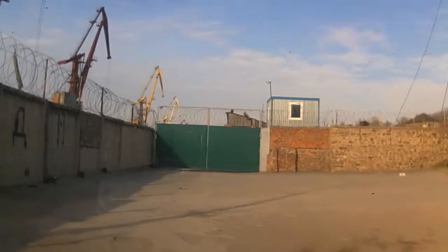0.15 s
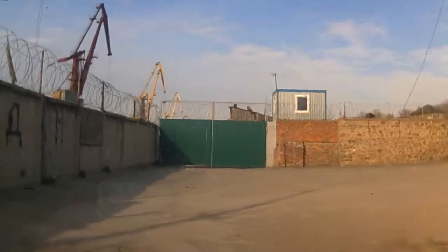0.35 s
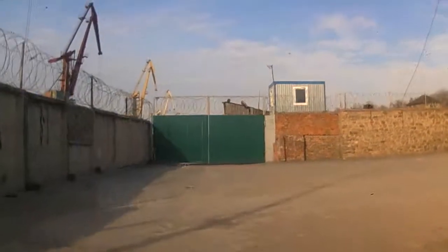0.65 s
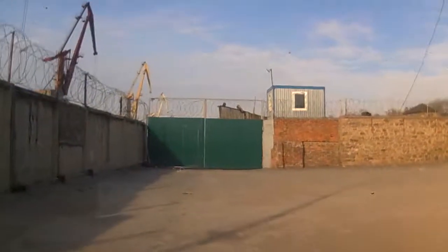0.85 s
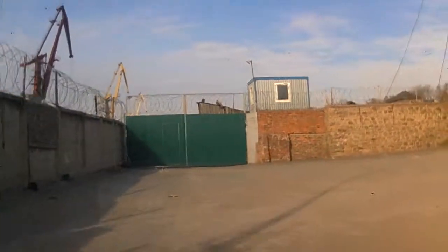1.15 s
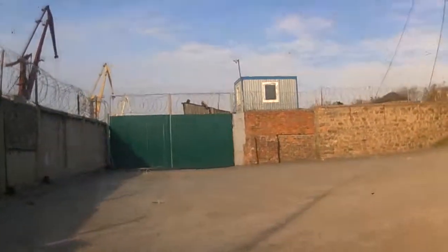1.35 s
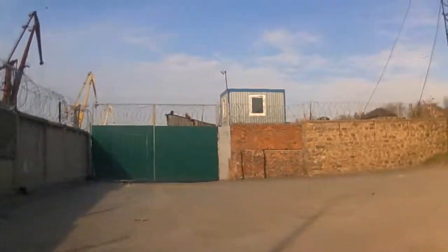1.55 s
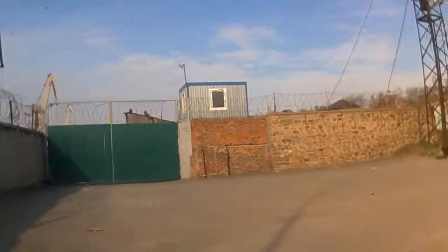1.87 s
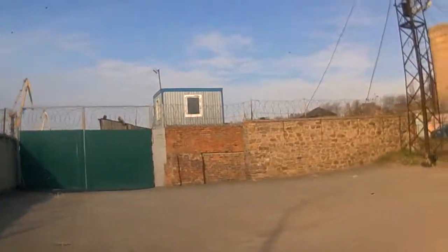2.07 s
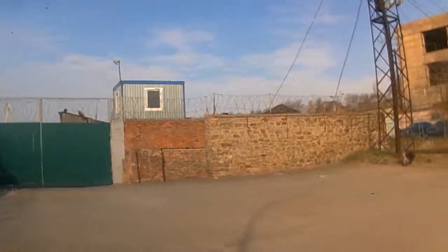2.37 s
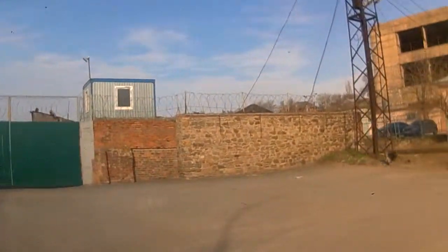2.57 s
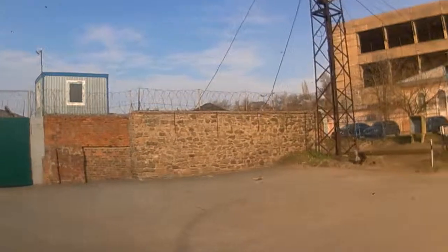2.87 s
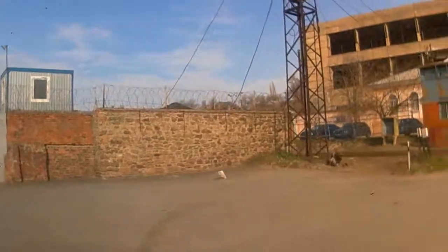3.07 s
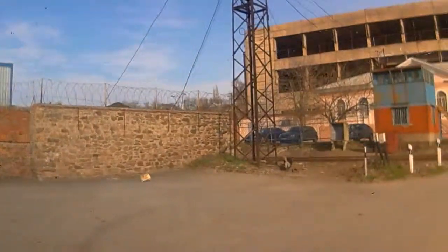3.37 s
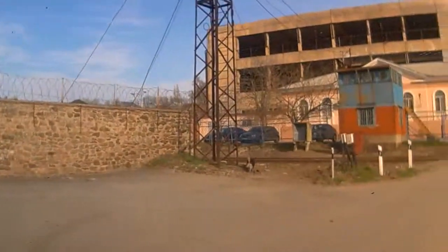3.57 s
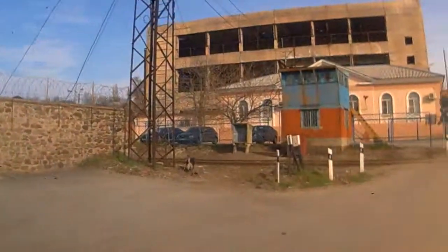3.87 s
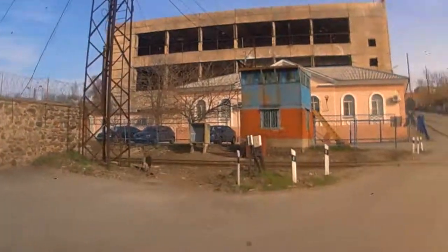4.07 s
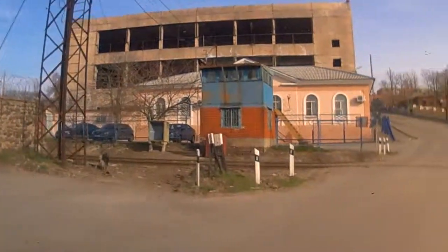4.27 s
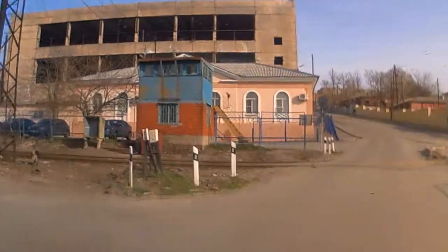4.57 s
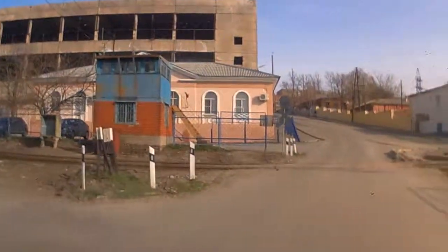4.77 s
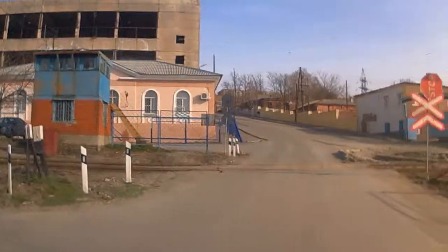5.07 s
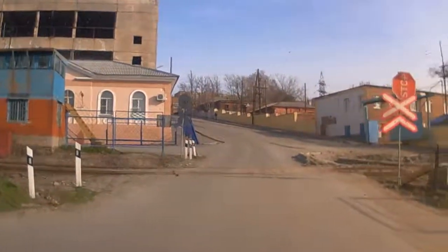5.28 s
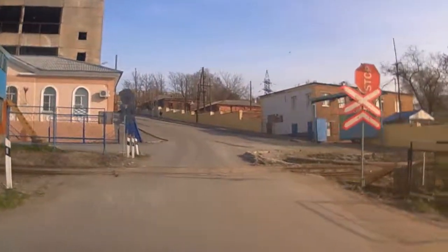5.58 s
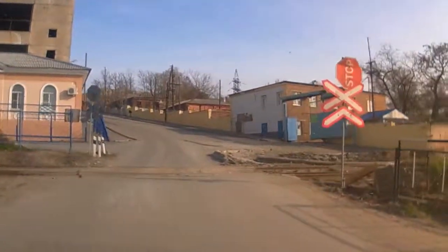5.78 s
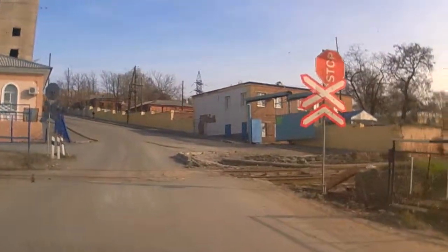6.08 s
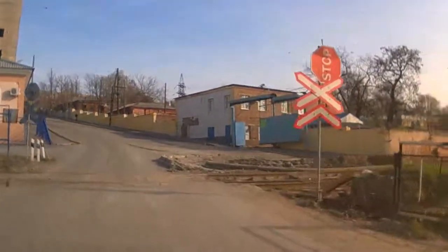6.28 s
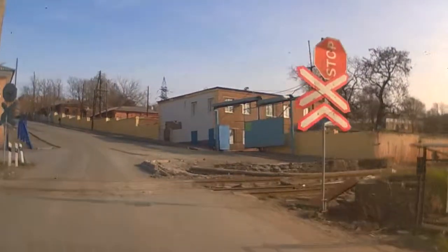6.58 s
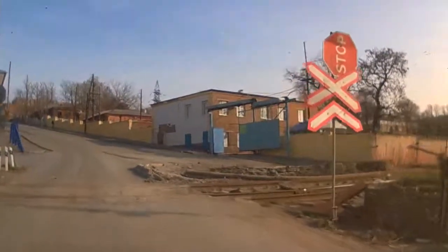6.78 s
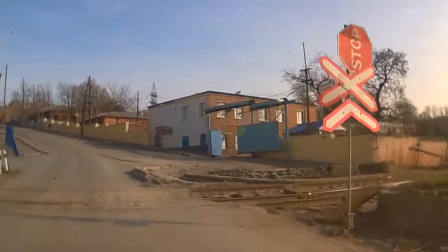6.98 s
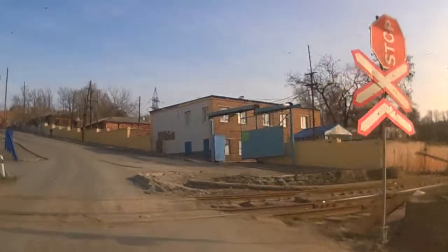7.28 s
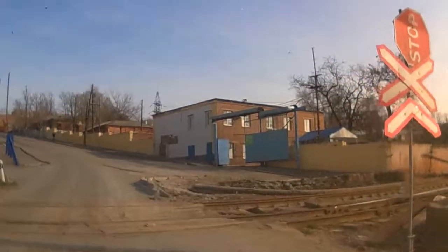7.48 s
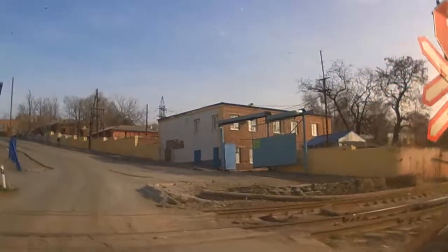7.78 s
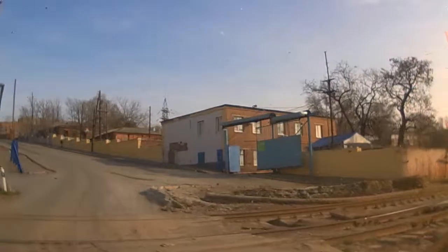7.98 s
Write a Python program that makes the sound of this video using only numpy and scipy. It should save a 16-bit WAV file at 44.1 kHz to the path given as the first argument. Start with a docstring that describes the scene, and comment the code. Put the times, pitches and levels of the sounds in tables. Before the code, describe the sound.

A car rolls slowly over rough ground, heard from inside as a low, uneven rumble over a faint engine hum. Four sharp knocks come from the steering column in the first three seconds, among dull suspension thuds and light trim rattles. The ride then calms, with a brief rubbery groan and one more knock around six seconds. The cabin sound is all on the left; the right carries only faint hiss and buzz.

```python
"""A low road rumble with sharp knocks, heard inside a car that rolls slowly over a rough yard, turns
and brakes. The ground shakes the body and the cabin air, a catch snaps in the steering column, loose
trim rattles, the suspension thuds and hands slide on the wheel over a faint engine hum. All of this is
on the left, the only side with a microphone. The open right input carries amplifier hiss and a buzz
from the picture electronics."""
import sys
import numpy as np
from scipy import signal
from scipy.fft import rfft, irfft
from scipy.io import wavfile
from scipy.ndimage import uniform_filter1d

SR = 44100
rng = np.random.default_rng(int(sys.argv[2]) if len(sys.argv) > 2 else 0)


def dump_mix(stems):
    """Bounce the given channels to the path in sys.argv[1] as a 16-bit WAV at rate SR."""
    frames = np.atleast_2d(stems).T  # one column per channel
    limited = np.clip(frames, -1, 1)  # hard clip at full scale
    pcm = np.round(limited * 32767).astype(np.int16)
    wavfile.write(sys.argv[1], SR, pcm)


N = 358974
T = np.arange(N) / SR


def road():
    """Rough ground rocks the body, sets the cabin air booming and shakes the suspension and panels."""
    # roughness of the ground: (time [s], rumble [dB], suspension drone [dB], tyre roar [dB])
    roughness = [(0, -54.5, -47.5, -58), (.33, -48, -45, -58), (.7, -54.5, -51, -57), (1.2, -52, -44, -57),
                 (1.42, -55, -46.5, -55), (1.58, -58, -53, -57), (1.75, -50, -45, -59),
                 (2.1, -56, -52, -63.5), (2.4, -51, -51, -57.5), (2.68, -57, -43.5, -53),
                 (2.95, -52, -49, -55.5), (3.7, -58.5, -46.5, -58), (4.1, -51, -48.5, -59.5),
                 (4.62, -53, -47.5, -61), (5.2, -51.5, -51.5, -60.5), (5.95, -56.5, -48.5, -61.5),
                 (6.4, -56.5, -52, -63), (6.92, -54, -53.5, -62.5), (7.05, -57, -55, -64.5),
                 (8.14, -57, -56, -67)]
    rumble = level(roughness)

    # the body pitches over bumps: (time [s], level [dB])
    jolts = [(.2, -36.5), (.54, -37), (.7, -44), (.88, -48), (1.09, -47), (1.47, -39.5), (1.65, -37),
             (1.77, -41.5), (2.45, -46), (2.57, -43), (2.69, -35), (2.76, -37.5), (2.85, -40.5),
             (3.4, -39.5), (3.74, -51), (4.19, -48), (4.44, -54), (4.6, -47), (4.76, -40.5), (5.24, -57),
             (5.49, -46), (6.67, -49), (7.07, -48), (7.75, -44)]
    # the deep sound of the rocking body: (frequency [Hz], level [dB])
    heave_spectrum = [(10, -4), (25, 3.5), (40, -4.5), (50, -9.5), (70, -30)]
    heave = swells(jolts, rise_s=0.027, fall_s=0.036, bed=rumble * gain_of(3.5) * flicker(5.7, 2.1))
    heave *= steadied(coloured(heave_spectrum), samples=2500)

    # ridges set the cabin air booming: (time [s], level [dB])
    ridges = [(.5, -35), (.62, -40), (.79, -61), (.94, -40), (1.32, -47), (1.47, -43), (1.72, -48),
              (1.87, -43), (2.16, -46), (2.44, -46.5), (2.56, -58), (2.83, -44), (3.08, -43), (3.26, -42.5),
              (3.44, -42.5), (3.56, -40), (3.74, -38), (3.9, -38), (4.2, -45), (4.31, -44), (4.42, -38),
              (4.6, -41), (4.73, -39.5), (5.1, -43), (5.43, -42.5), (5.58, -39), (5.98, -45.5), (6.2, -45),
              (6.36, -44.5), (6.66, -54), (6.94, -46), (7.14, -44)]
    boom_hz, boom_width_hz = 55.7, 21.8  # lowest resonance of the cabin air
    boom = swells(ridges, rise_s=0.047, fall_s=0.07, bed=rumble * gain_of(4.9) * flicker(22, 2.3))
    boom *= steadied(ringing_noise([(boom_hz, boom_width_hz, 0)]), samples=1600)

    # suspension resonances: (frequency [Hz], width [Hz], level [dB])
    drone_modes = [(107.4, 35, 2), (136.7, 15, -6.5), (191.8, 66, -6), (262, 39, -17.5)]
    drone = evened(ringing_noise(drone_modes) * flicker(25, 0.23) * flicker(9, 1.9))

    # tyre noise: (frequency [Hz], level [dB])
    tyre_spectrum = [(150, -10.5), (250, -0.5), (340, -4), (550, -8), (1020, -15.5), (1500, -19),
                     (2100, -26.5), (2900, -34.5), (4000, -48)]
    # panel resonances: (frequency [Hz], width [Hz], level [dB])
    panel_modes = [(406, 140, -15), (750, 190, -12), (1687, 230, -18)]
    roar = evened((coloured(tyre_spectrum) + ringing_noise(panel_modes)) * flicker(45, 2.9))
    return heave + boom + level(roughness, column=2) * drone + level(roughness, column=3) * roar


def steering_knocks():
    """A catch in the steering column snaps over and bounces the same way each time, so knocks are alike."""
    # snaps: (time [s], level [dB], bass [dB], middle [dB], brightness [dB per octave], tick [dB])
    snaps = [(0.6406, -16.5, -0.5, -3, 0.1, -53), (1.3549, -17, 2, -0.2, 1.5, -53.5),
             (2.099, -17.5, -2.5, -2, .2, -57), (2.248, -43.5, -8, -6, 8, -65),
             (2.7415, -24.5, 0, 1.5, 2.5, -64.5), (6.1001, -27.5, -1.5, 2, 0, -71),
             (6.243, -43, -3, 8, 4.5, -82), (7.8, -43.5, -16, -12, 8.5, -70)]
    # bounces after each snap: (delay [s], level [dB])
    rebounds = [(.0017, 4), (.0036, 2), (.0054, 6), (.0073, 7), (.0112, -4), (.015, -11), (.0195, -8),
                (.024, -14)]
    out, blows = np.zeros(N), np.zeros(2000)
    blows[0] = 1
    for delay, db in rebounds:
        blows[round(delay * SR)] = gain_of(db)
    for (start, db, bass_db, middle_db, tilt_db, tick_db), tick in zip(snaps, ticks(len(snaps), t60=0.08)):
        knock = signal.fftconvolve(blows, dashboard_ring(3500, tilt_db, bass_db, middle_db))
        add(out, start, gain_of(db) * knock / abs(knock).max())
        add(out, start, gain_of(tick_db) * tick)
    return out


def dashboard_ring(samples, tilt_db, bass_db=0., middle_db=0., t60=np.inf):
    """Column and dashboard ring after one soft blow; t60 caps the seconds a tone takes to fade 60 dB."""
    # their resonances: (frequency [Hz], level [dB], time to fade 60 dB [s])
    modes = [(223, -1.5, 0.041), (268, -9.5, 0.045), (321, -19.5, 0.26), (437, -33, 0.028),
             (486, 0.5, 0.035), (671, 6, 0.042), (852, -16.5, 0.11), (947, 1.5, 0.029), (1133, 1.5, 0.023),
             (1300, -8.5, 0.077), (1400, -8, 0.042), (1622, -15.5, 0.011), (1795, -4, 0.028),
             (1966, -3.5, 0.016), (2320, -10.5, 0.02), (2632, -17.5, 0.054), (2890, -10.5, 0.04)]
    hz, db, own_t60 = np.transpose(modes)[:, :, None]
    t = T[:samples]
    db = db + tilt_db * np.log2(hz / 1000) + bass_db * (hz < 600) + middle_db * (abs(hz - 740) < 120)
    direction = (-1.) ** (np.arange(len(hz))[:, None] // 3)  # groups of three swing opposite ways
    tones = direction * gain_of(db - 60 * t / np.minimum(own_t60, t60)) * np.sin(2 * np.pi * hz * t)
    contact_s = 0.00036  # the blow presses hardest after this time
    blow = np.exp(-((T[:60] - contact_s) / (contact_s / 3)) ** 2 / 2)
    return np.convolve(tones.sum(0), blow)


def trim_rattles():
    """Loose trim hits the dashboard once hard, then chatters briefly; brighter rattles tick louder."""
    # rattles: (time [s], level [dB], brightness [dB per octave], time for chatter to fade 60 dB [s])
    rattles = [(0.146, -58.5, 13, 0.035), (0.348, -58.5, 2, 0.063), (0.528, -75, 6, 0.1),
               (0.758, -66, 15, 0.1), (0.852, -55.5, 17.5, 0.096), (0.893, -60.5, 15, 0.027),
               (0.964, -59, 5, 0.12), (1.06, -60.5, -2, 0.08), (1.419, -52, 15, 0.094),
               (1.499, -50, -7, 0.05), (1.601, -54.5, 8.5, 0.13), (1.939, -66, 16, 0.098),
               (2.269, -56, -1, 0.19), (2.479, -53.5, -1, 0.076), (2.513, -56, 3, 0.086),
               (2.568, -57.5, 2, 0.056), (2.599, -55.5, 8, 0.08), (2.635, -51, 3.5, 0.047),
               (2.669, -60, -2, 0.08), (2.687, -64, 16, 0.08), (2.719, -49.5, 4, 0.055),
               (2.841, -50.5, 3.5, 0.071), (2.872, -50, 1, 0.096), (2.906, -47.5, 2.5, 0.1),
               (3.005, -60, 0, 0.081), (3.107, -56, -6, 0.12), (3.404, -72, -3, 0.068),
               (3.518, -61.5, 11, 0.038), (4.343, -62, 5, 0.083), (4.66, -56, -1, 0.033),
               (4.711, -58, 0, 0.088), (5.338, -58, -3.5, 0.13), (5.787, -57.5, -6, 0.075),
               (6.409, -62, 2, 0.13), (6.629, -62, 16, 0.21), (6.899, -65, 3, 0.08), (7.163, -61, 16, 0.06),
               (7.985, -59, 18, 0.11), (8.003, -51.5, 7.5, 0.074), (8.127, -59.5, 3.5, 0.18)]
    out, t = np.zeros(N), T[:4000]
    hold_s = 0.0083  # even chatter before the fade
    first_hit = 1.4 * np.exp(-t / 0.00047)
    noises = rng.standard_normal((len(rattles), len(t)))
    for (start, db, tilt_db, t60), noise, tick in zip(rattles, noises, ticks(len(rattles), t60=0.12)):
        fade = gain_of(-60 * np.maximum(t - hold_s, 0) / t60)
        rattle = signal.fftconvolve(noise * (first_hit + fade), dashboard_ring(900, tilt_db, t60=0.018))
        add(out, start, gain_of(db) * rattle / np.std(rattle[:600]))
        add(out, start, gain_of(db - 28.5 + 1.03 * tilt_db) * tick)
    return out


def suspension_thuds():
    """Suspension and seats bump dully: short, low rings with a soft start."""
    # bumps: (time [s], level [dB], pitch [Hz])
    thuds = [(0.231, -41, 306), (0.318, -34, 303), (0.416, -33, 315), (1.176, -40.5, 226),
             (2.344, -45.5, 768), (2.688, -48, 313), (2.96, -49, 650), (3.164, -51, 232),
             (6.895, -50.5, 330), (7.172, -52, 562), (7.998, -39.5, 158), (8.005, -38.5, 244),
             (8.008, -50, 471)]
    partials = [(1, 1), (0.853, .5), (1.2, 0.24), (2.5, 0.15)]  # (pitch ratio, strength)
    out, t = np.zeros(N), T[:5000]
    envelope = 1.23 * gain_of(-60 * t / 0.087) * (1 - np.exp(-t / 0.0029))
    for start, db, hz in thuds:
        swing = sum(strength * np.sin(2 * np.pi * ratio * hz * t) for ratio, strength in partials)
        add(out, start, gain_of(db) * envelope * swing)
    return out


def rubber_groan():
    """Rubber creeps on metal: a wavering, sinking tone wrapped in noise."""
    # the creep: (start [s], hold [s], level [dB])
    creep = [(5.83, 0.17, -52)]
    # resonances of the groan: (frequency [Hz], width [Hz], level [dB])
    modes = [(437, 200, 2.5), (510, 62, -7), (660, 67, -7), (860, 82, -7), (930, 79, -7), (1160, 150, -9.5),
             (1720, 200, -16), (1970, 210, -17)]
    start_hz, sag_hz_per_s = 463, 91
    hz = (start_hz - sag_hz_per_s * np.clip(T - creep[0][0], 0, 1)) * flicker(35, 0.071)
    tone = np.sin(2 * np.pi * np.cumsum(hz) / SR)
    groan = evened(gain_of(6.0) * tone + ringing_noise(modes) * flicker(40, 1.4))
    return swells(creep, rise_s=0.013, fall_s=0.036) * groan


def plastic_clicks():
    """Plastic parts touch: tiny ticks with no ring."""
    # touches: (time [s], level [dB])
    clicks = [(0.3985, -60), (0.5294, -69), (1.5594, -57), (1.7175, -59), (2.9352, -63), (5.829, -64),
              (5.877, -62), (3.5194, -70), (5.3882, -65)]
    out = np.zeros(N)
    for (start, db), tick in zip(clicks, ticks(len(clicks), t60=0.028)):
        add(out, start, gain_of(db) * tick / abs(tick).max())
    return out


def ticks(count, t60):
    """Hard surfaces meet in bright bursts of noise, one a row, that fade 60 dB in t60 seconds."""
    # tone colour of a tick: (frequency [Hz], level [dB])
    spectrum = [(2500, -20), (3300, 2.5), (4600, 2), (5600, -5.5), (7500, -9), (10000, -19), (15500, -17)]
    t = T[:2500]
    noises = coloured(spectrum)[:count * len(t)].reshape(count, -1)
    return noises * gain_of(-60 * t / t60) * (1 - np.exp(-t / 0.0008))


def sliding_hands():
    """Palms slide on the wheel with a grainy hiss; the resting grip rustles faintly."""
    # slides: (start [s], hold [s], level [dB])
    slides = [(.3, 0.34, -82.5), (.6, 0.27, -75.5), (1.27, 0.5, -79.5), (2.29, .02, -84.5),
              (3.47, .02, -87), (6.03, 0.21, -80.5), (6.45, 0.21, -79), (6.85, 0.061, -82),
              (7.49, .02, -86.5)]
    # bands of hiss from skin on the rim: (frequency [Hz], width [Hz], level [dB])
    rim_bands = [(1230, 400, 5), (1950, 1150, 7), (4550, 1540, 0.5), (7000, 1400, -11)]
    grain = flicker(110, 2.5)
    return swells(slides, rise_s=0.14, fall_s=.11, bed=gain_of(-90)) * ringing_noise(rim_bands) * grain


def engine():
    """The turning engine hums at one pitch, with a faint whine from the engine bay."""
    # hum: (frequency [Hz], width [Hz], level [dB])
    hum_band = [(141.4, 14, -66)]
    # whine: (frequency [Hz], width [Hz], level [dB])
    whine_bands = [(428.4, 6.5, -4.5), (834, 25, -7.5), (1756, 29, -22)]
    # loudness of the whine: (time [s], level [dB])
    whine_curve = [(0, -70.5), (2.3, -67.5), (3.3, -67), (4.5, -65.5), (5.7, -66.5), (6.2, -75.5),
                   (8.14, -75.5)]
    return ringing_noise(hum_band) + level(whine_curve) * ringing_noise(whine_bands)


def electronic_buzz():
    """Picture electronics give one ragged burst of bright noise per cycle, over weaker unbroken noise."""
    # underlying loudness: (time [s], level [dB])
    bed_curve = [(0, -87), (3.4, -83), (3.65, -75), (3.9, -76), (4.15, -69), (4.45, -73), (5.1, -78),
                 (5.5, -65), (6.0, -62.5), (6.45, -62), (6.95, -63.5), (7.55, -68), (7.95, -77),
                 (8.14, -72)]
    # the buzz flares up: (start [s], hold [s], level [dB])
    flares = [(.4, 0.066, -78), (1.02, .01, -75), (1.25, .01, -70), (1.48, .04, -76), (2.64, .01, -77),
              (4.06, .01, -71), (4.31, .01, -72), (4.56, 0.13, -63.5), (4.96, .01, -82), (5.31, .01, -71),
              (5.61, 0.011, -55.5), (5.73, .01, -56.5), (5.84, .01, -52.5), (5.95, .01, -63),
              (6.08, 0.014, -59), (6.21, 0.0082, -60), (6.31, .01, -63), (6.53, 0.035, -63),
              (6.71, .01, -62), (6.79, .03, -58.5), (6.97, 0.048, -68), (7.07, .06, -57), (7.2, .01, -64),
              (7.28, 0.094, -59.5), (7.48, .01, -58.5), (7.64, .01, -64), (7.86, .02, -71),
              (8.04, .01, -72)]
    # tone colour of the buzz: (frequency [Hz], level [dB])
    spectrum = [(2000, -22), (5000, -21), (8000, -17.5), (11000, -12), (14000, -6), (16000, 0)]
    buzz_hz = 60 / 1.001
    cycles = T * buzz_hz - .08
    chance = rng.standard_normal((int(cycles[-1]) + 2, 3))  # every burst is a little different
    size, lateness, width = chance[np.floor(cycles).astype(int) + 1].T
    offset = (cycles % 1 - .55 - 0.044 * lateness) / (0.15 * gain_of(2.9 * width))
    shape = np.where(offset > 0, np.exp(-offset ** 8), np.exp(-(offset / 1.7) ** 2))  # grows, stops short
    bursts = shape * gain_of(1.2 * size) * flicker(300, 7.0) + 0.55
    bursts /= np.sqrt(uniform_filter1d(bursts ** 2, 3000))  # keep the average power even
    loudness = swells(flares, rise_s=0.048, fall_s=0.028, bed=level(bed_curve) * flicker(20, 2.0))
    return loudness * bursts * coloured(spectrum)


def gain_of(db):
    """Turns decibels into a multiplier."""
    return 10 ** (np.asarray(db) / 20)


def evened(x):
    """Scales a signal to an average power of 1."""
    return x / np.sqrt(np.mean(x ** 2) + 1e-20)


def steadied(x, samples):
    """Irons out part of the chance swelling of narrow-band noise."""
    return evened(x / (uniform_filter1d(x ** 2, samples) + 0.13) ** 0.22)


def level(rows, column=1):
    """Gain over time from one dB column of a curve; silent outside it."""
    times, db = np.array(rows)[:, [0, column]].T
    return gain_of(np.interp(T, times, db)) * (T >= times[0]) * (T <= times[-1])


def swells(rows, rise_s, fall_s, bed=0.):
    """Gain over time: each row rises, holds if it has a length, and falls, on top of a background gain."""
    power = bed ** 2 + np.zeros(N)
    for start, *hold, db in rows:
        away = np.maximum((start - T) / rise_s, (T - start - sum(hold)) / fall_s)
        power += gain_of(db) ** 2 * np.exp(-2 * np.maximum(away, 0) ** 2)
    return np.sqrt(power)


def flicker(per_s, depth_db):
    """Gain that wanders to a new random value per_s times a second."""
    steps = rng.standard_normal(int(N / SR * 400) + 2)
    return gain_of(depth_db * np.interp(T * per_s, np.arange(len(steps)), steps))


def coloured(points):
    """Steady noise with the given spectrum and an average power of 1."""
    point_hz, db = np.transpose(points)
    hz = np.fft.rfftfreq(N, 1 / SR)
    shape_db = np.interp(np.log(hz + 1), np.log(point_hz + 1), db, left=-100, right=-100)
    return evened(irfft(rfft(rng.standard_normal(N)) * gain_of(shape_db), N))


def ringing_noise(modes):
    """Noise in a set of steep resonances, each at its own level."""
    f = np.fft.rfftfreq(N, 1 / SR)
    power = sum(gain_of(db) ** 2 / width / (1 + (2 * (f - hz) / width) ** 2) ** 2 for hz, width, db in modes)
    total_gain = np.sqrt(sum(gain_of(db) ** 2 for _, _, db in modes))
    return total_gain * evened(irfft(rfft(rng.standard_normal(N)) * np.sqrt(power), N))


def add(mix, start_s, sound):
    """Mixes a sound in at the given time."""
    part = mix[round(start_s * SR):][:len(sound)]
    part += sound[:len(part)]


def scene():
    """The cabin on the left, the buzz on the right."""
    cabin = engine() + road() + sliding_hands() + steering_knocks()
    cabin += trim_rattles() + plastic_clicks() + rubber_groan() + suspension_thuds()
    return np.array([cabin, electronic_buzz()])


def record(dry):
    """The left side is amplified and gains a faint whine; both sides get hiss and lose the top treble."""
    # thin, high tones: (frequency [Hz], level [dB])
    whine_tones = [(9982, -89), (10058, -89)]
    # amplifier hiss: (left level [dB], right level [dB])
    hiss_db = [-69.5, -67]
    preamp_db, cutoff_hz = 7.5, 15780
    whine = sum(gain_of(db) * np.sin(2 * np.pi * hz * T) for hz, db in whine_tones)
    wet = np.array([gain_of(preamp_db) * dry[0] + whine, dry[1]])
    wet += gain_of(hiss_db)[:, None] * rng.standard_normal((2, N))
    treble_cut = signal.firwin(1023, cutoff_hz, window=("kaiser", 9), fs=SR)
    return signal.oaconvolve(wet, treble_cut[None], "same")


dry = scene()
out = record(dry)
dump_mix(out)
```